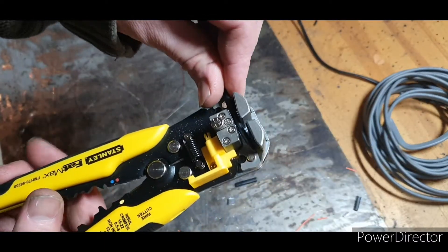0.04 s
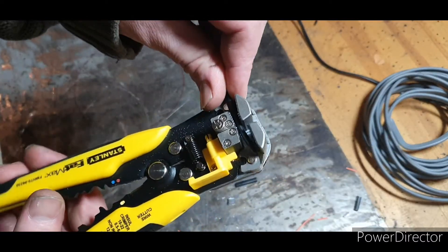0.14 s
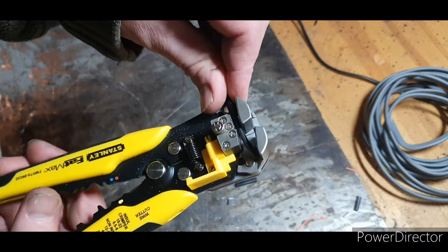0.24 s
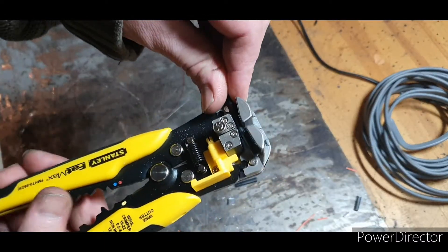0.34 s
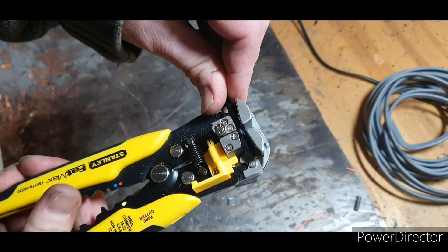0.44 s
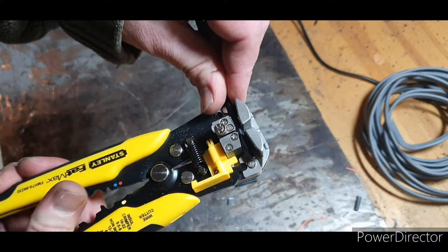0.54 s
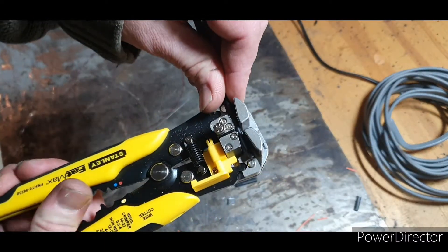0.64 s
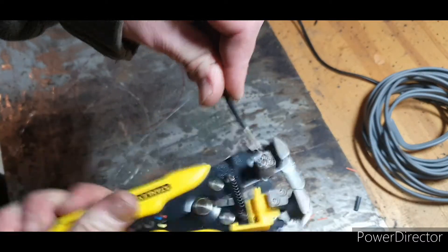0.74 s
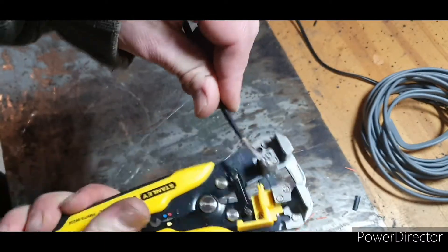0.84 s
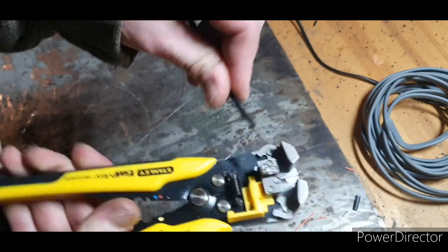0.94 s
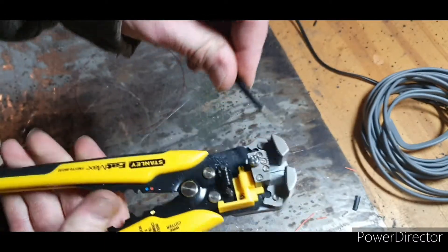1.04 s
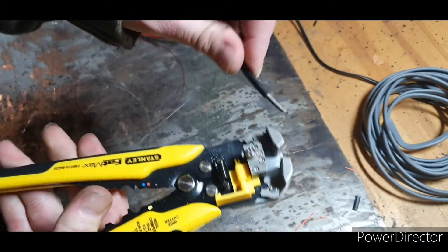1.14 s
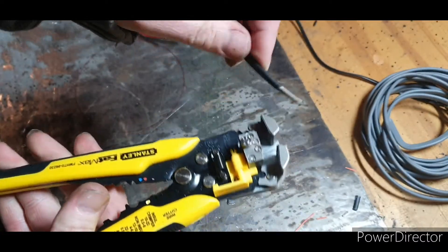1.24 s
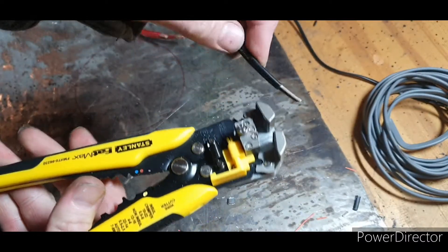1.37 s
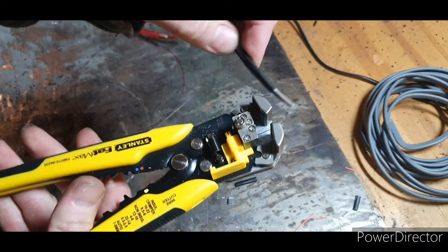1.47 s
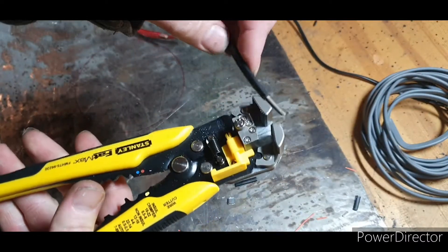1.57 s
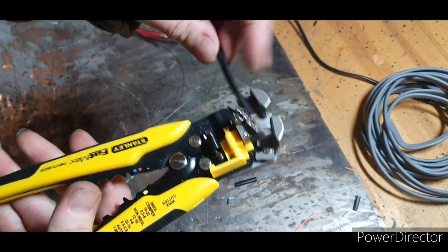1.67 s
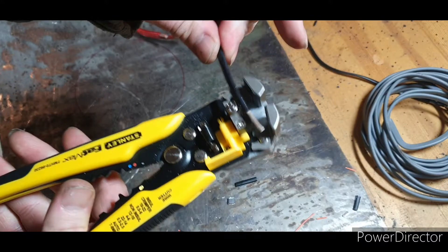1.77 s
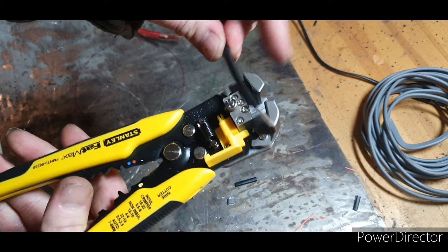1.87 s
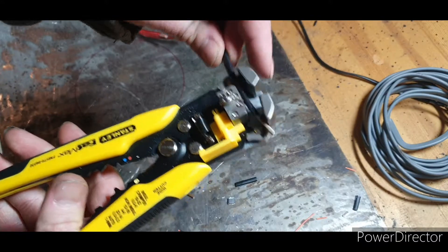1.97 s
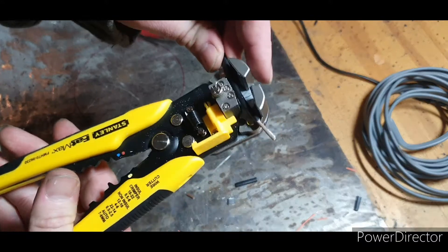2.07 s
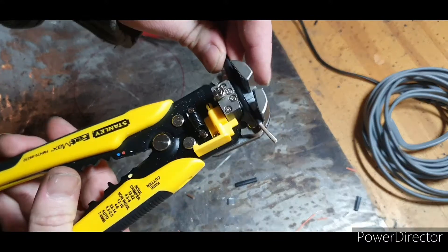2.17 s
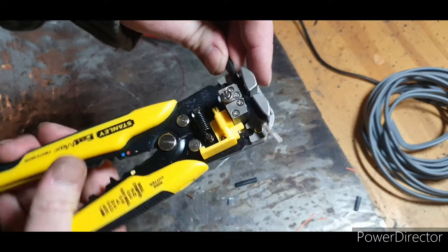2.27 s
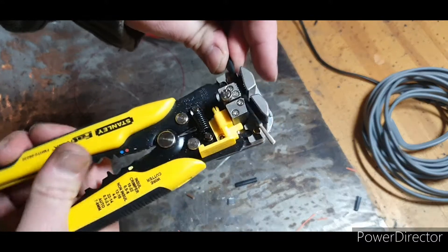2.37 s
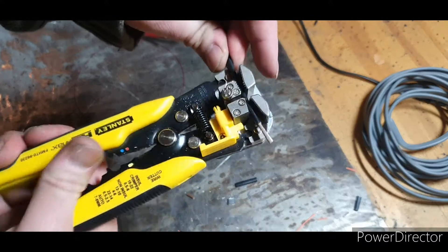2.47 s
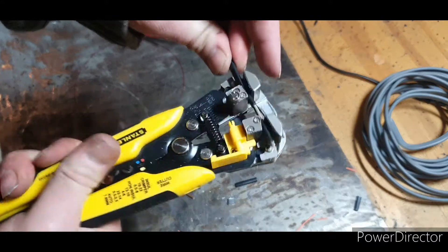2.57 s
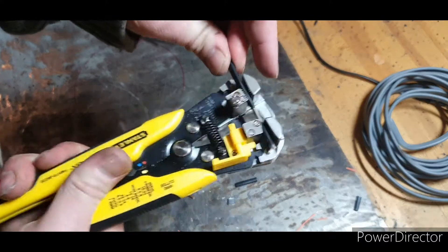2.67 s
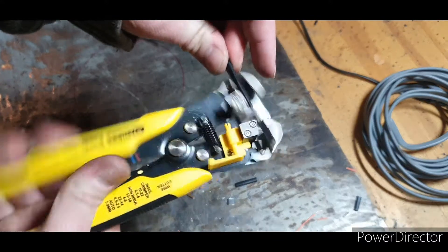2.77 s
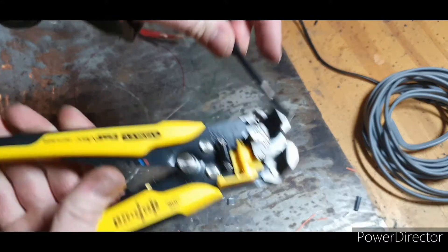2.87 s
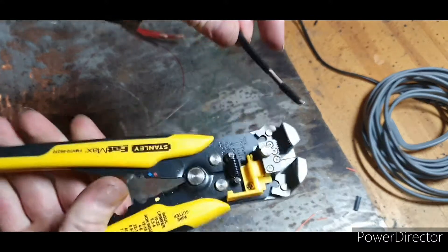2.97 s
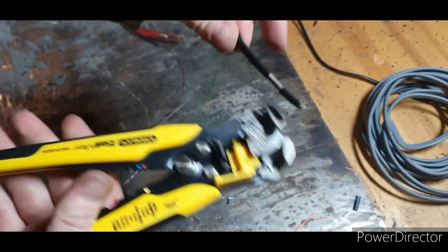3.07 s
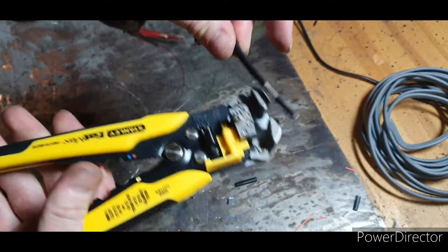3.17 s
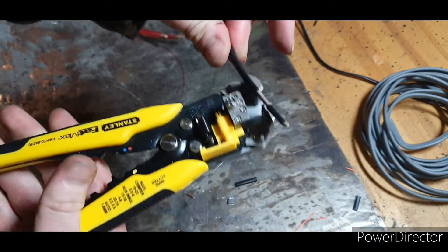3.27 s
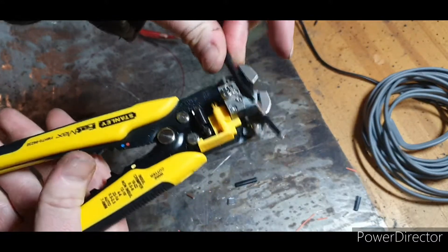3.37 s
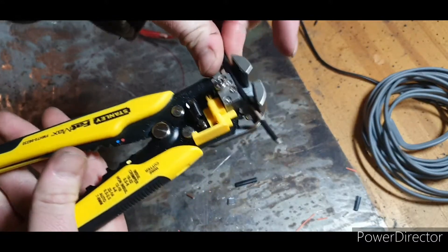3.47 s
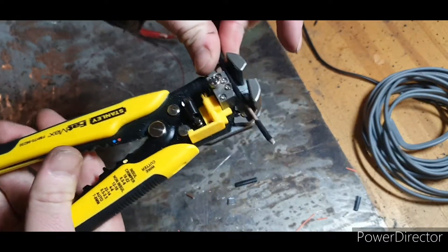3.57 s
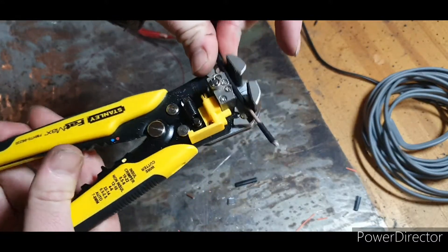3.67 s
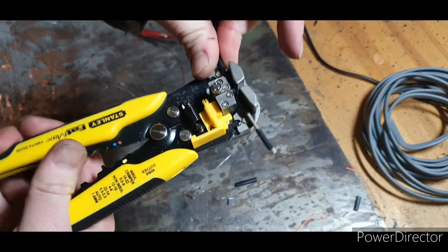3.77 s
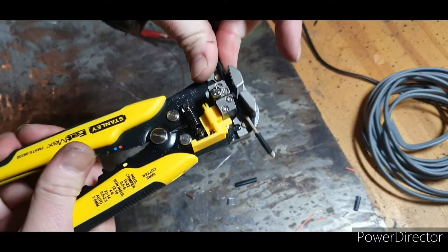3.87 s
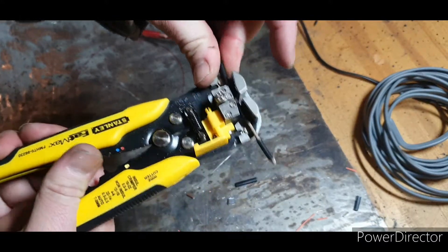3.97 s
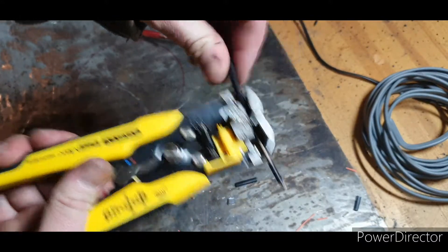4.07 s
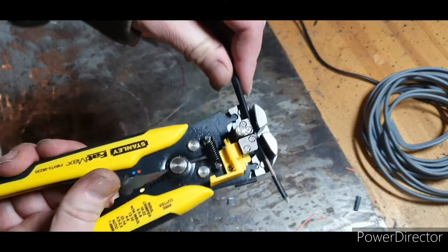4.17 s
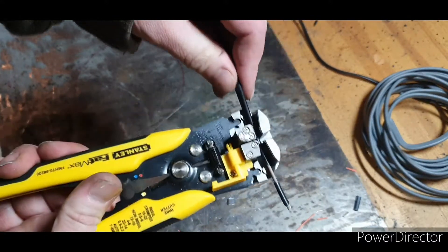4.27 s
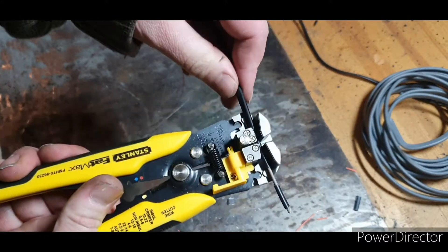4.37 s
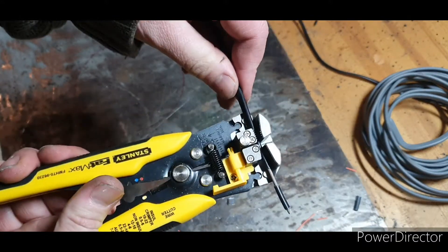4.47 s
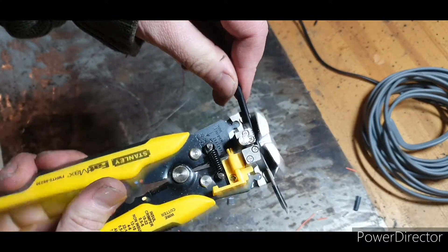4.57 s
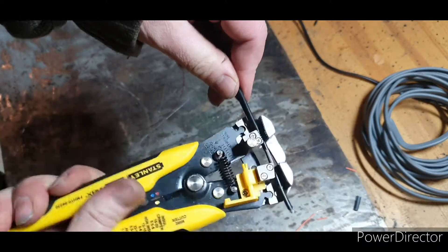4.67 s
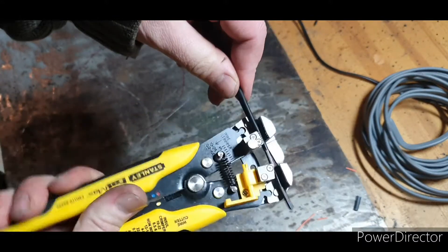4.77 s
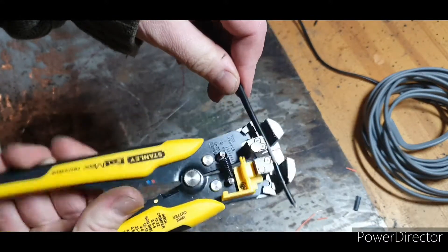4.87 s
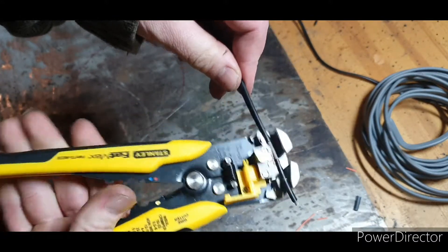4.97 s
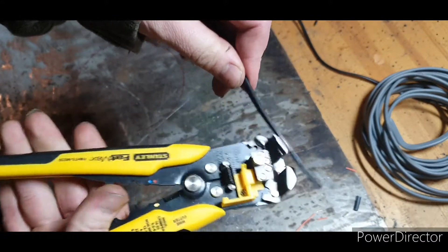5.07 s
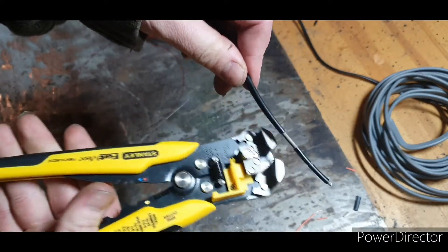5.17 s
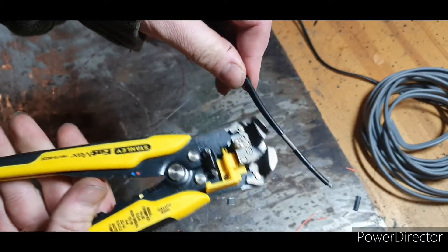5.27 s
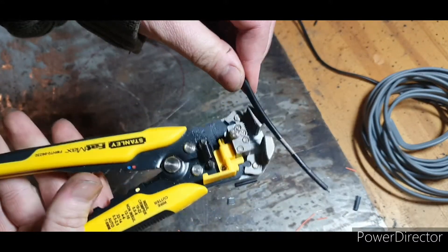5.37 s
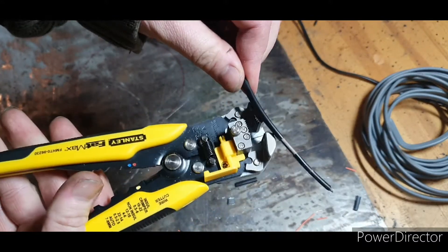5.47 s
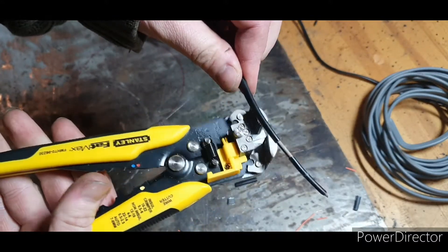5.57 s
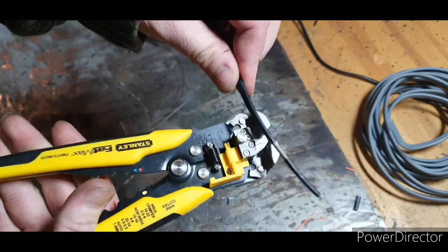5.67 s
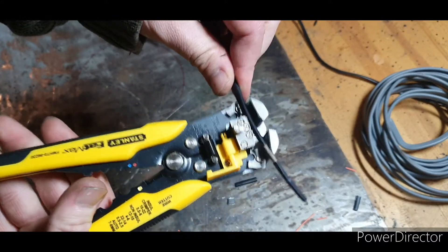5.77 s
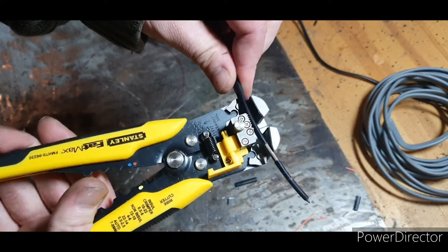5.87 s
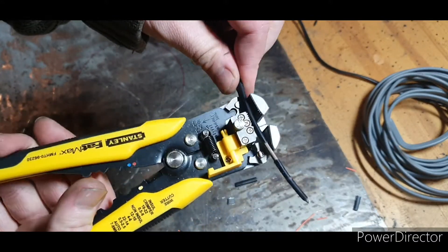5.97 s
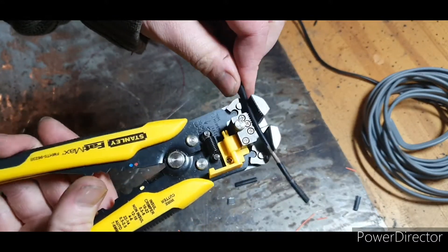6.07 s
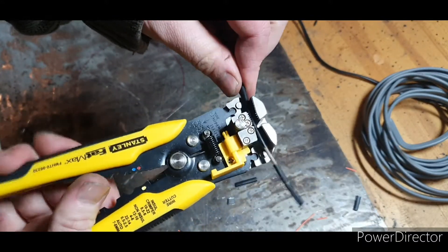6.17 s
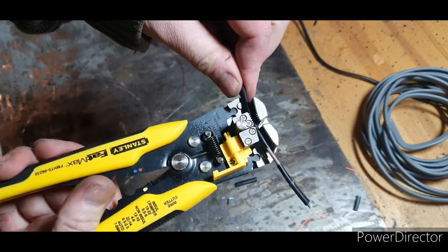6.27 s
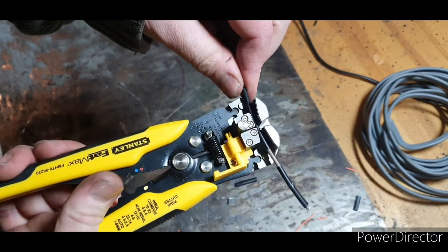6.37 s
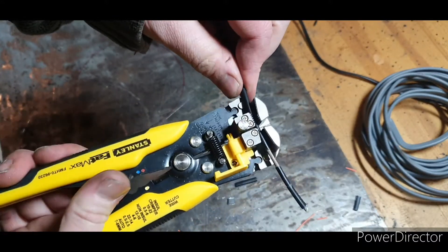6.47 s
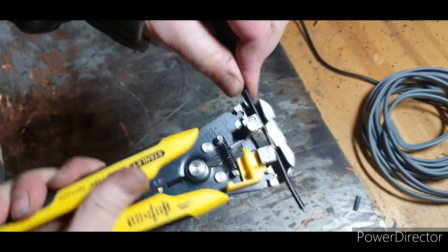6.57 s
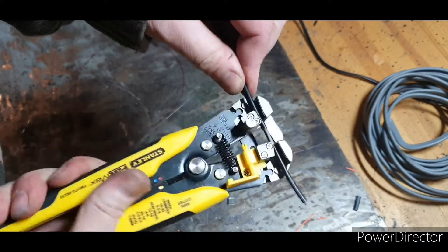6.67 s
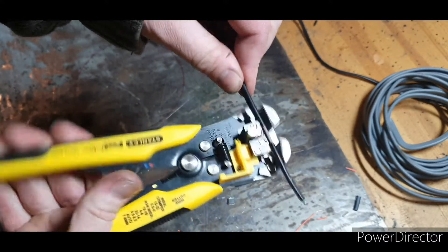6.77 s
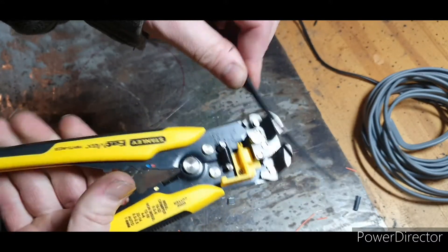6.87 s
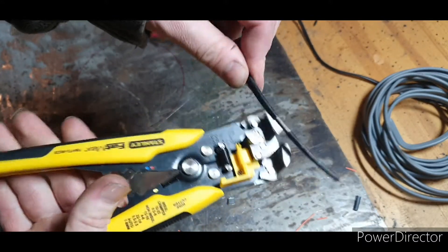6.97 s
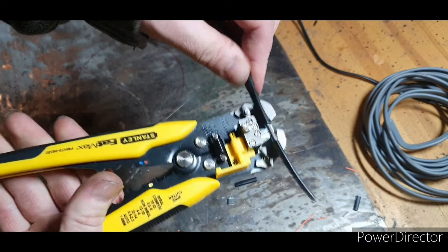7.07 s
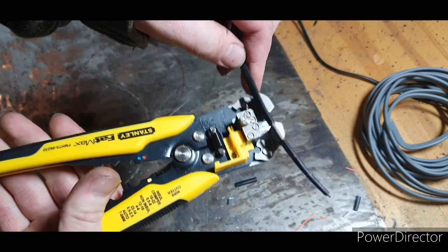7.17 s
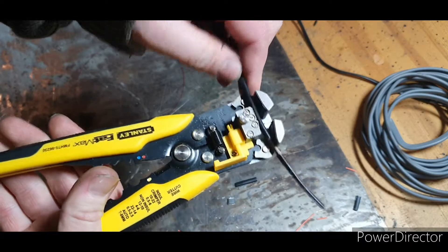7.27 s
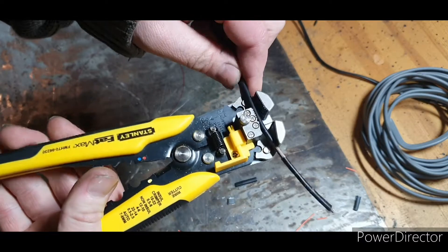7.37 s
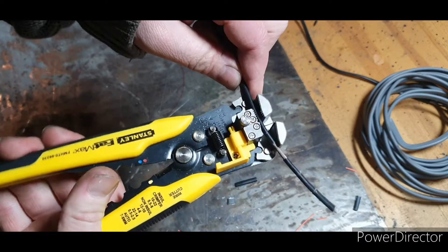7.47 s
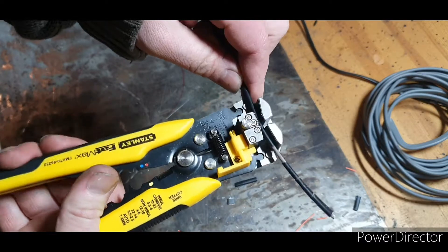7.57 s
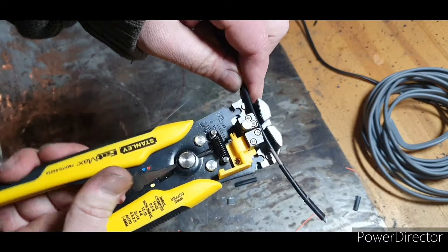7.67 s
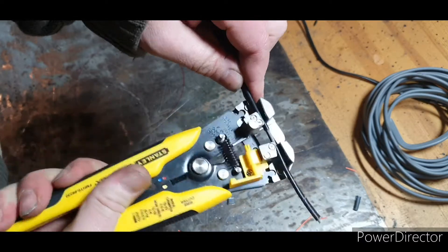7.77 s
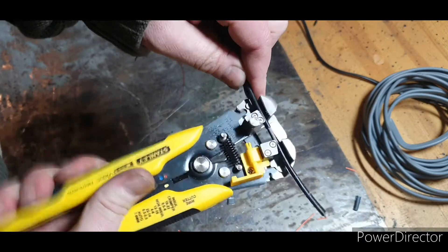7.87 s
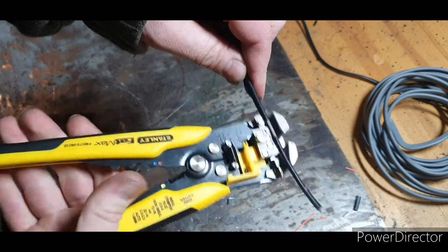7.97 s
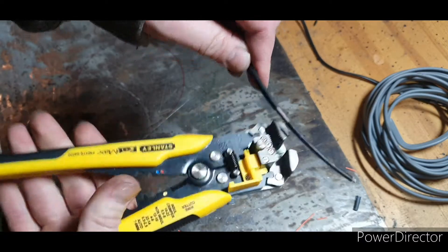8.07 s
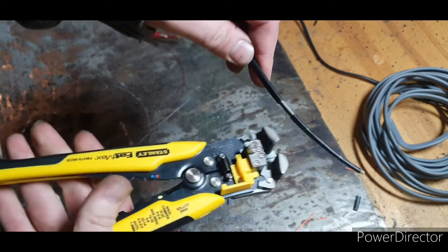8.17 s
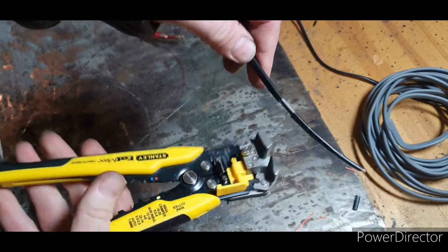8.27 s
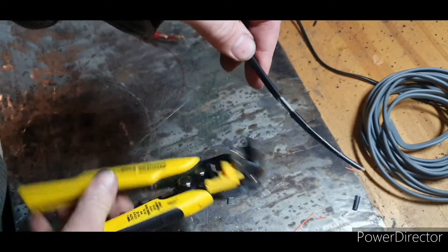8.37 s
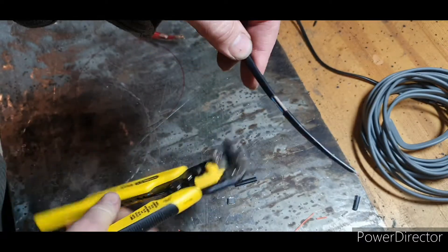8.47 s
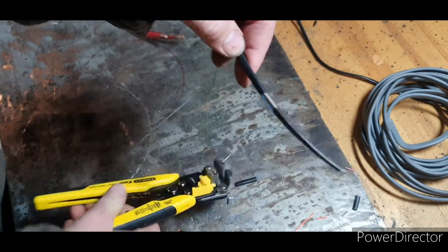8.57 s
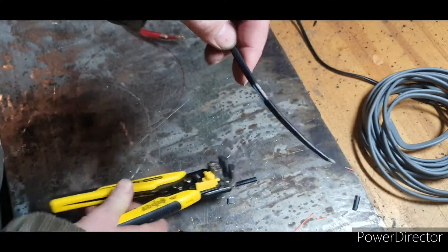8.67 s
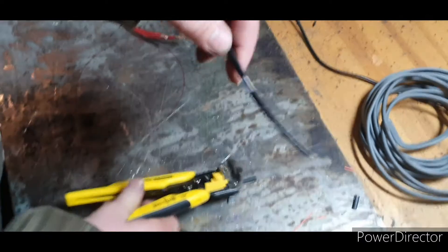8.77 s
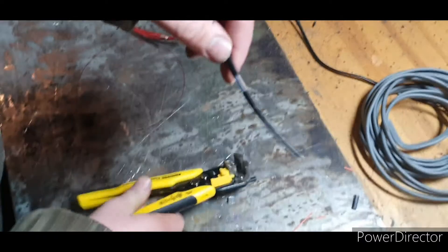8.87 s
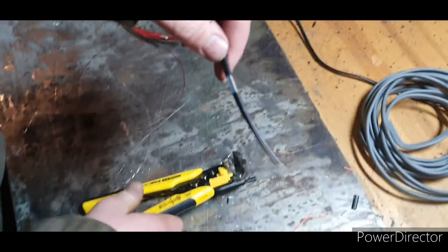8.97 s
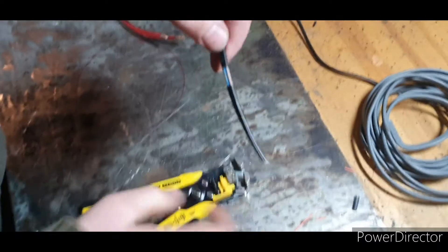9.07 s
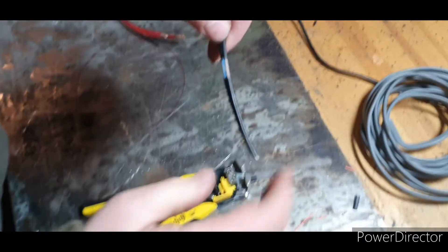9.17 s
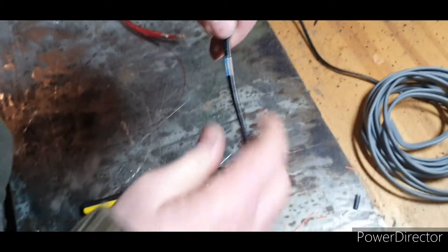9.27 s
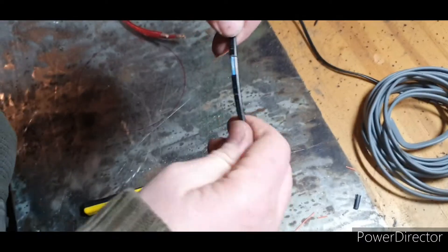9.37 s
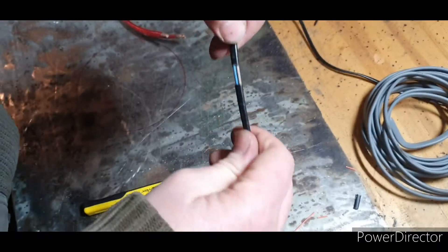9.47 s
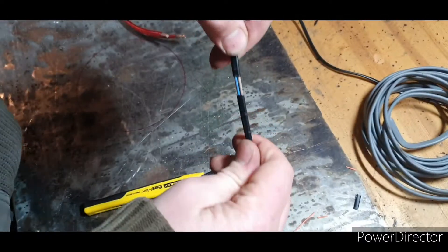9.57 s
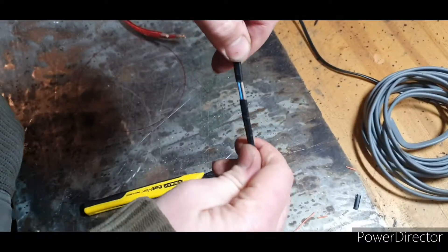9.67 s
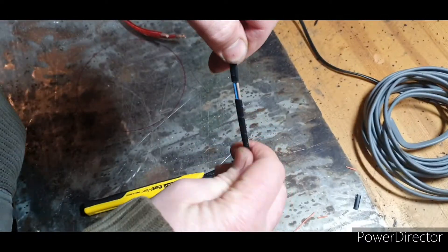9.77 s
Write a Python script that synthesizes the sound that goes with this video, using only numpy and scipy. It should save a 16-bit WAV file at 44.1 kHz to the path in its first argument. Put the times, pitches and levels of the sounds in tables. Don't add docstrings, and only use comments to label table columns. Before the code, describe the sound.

Over a faint distant rumble and thin hiss, wire strippers bite and tear insulation, pause briefly, then release and clack open, five times at uneven intervals. Wire feeding makes tiny scratchy ticks, skin rubs softly on plastic, cloth barely rustles. Short wall reflections follow the sharp hits. At the end, steel lands on a hollow board with a boom, a small rock, and a harder double knock. Phone microphones very close.

```python
import sys
import numpy as np
from scipy import signal
from scipy.fft import rfft, irfft
from scipy.io import wavfile
from scipy.ndimage import uniform_filter1d, map_coordinates

SR = 44100
rng = np.random.default_rng(int(sys.argv[2]) if len(sys.argv) > 2 else 0)


def output_pcm(signal):
    pcm = np.clip(np.atleast_2d(signal).T, -1, 1) * 32767
    wavfile.write(sys.argv[1], SR, np.round(pcm).astype(np.int16))


def elevation(decibels):
    levels = np.asarray(decibels, float)
    return 10 ** (levels / 20)


N = 433503
SPAN = 16384
HZ = np.fft.rfftfreq(SPAN, 1 / SR)
LAG = 9
SIDE = np.array([[.5], [-.5]])

# start_s, peak_db, first_kick_pitch_hz
SQUEEZES = [
    (0.741, -22, 106.3),
    (2.543, -21.5, 120),
    (4.6399, -20.5, 218.8),
    (6.593, -20.5, 200),
    (7.779, -22.5, 149),
]
# start_s, peak_db, strongest_ring_hz, added_scrape_ms
LANDINGS = [
    (8.7897, -12.5, 4200, 4.6),
    (8.9705, -27, 2130, 7.8),
    (9.0377, -36, 5530, 0.51),
    (9.1109, -14, 2800, .85),
    (9.1223, -8, 2020, 2.6),
    (9.1657, -19.5, 2060, 1.6),
]
# frequency_hz, left_over_right_db
BENCH_PAN = [(50, 1.5), (90, -7), (130, 0.5), (200, -2.5), (320, 3.5), (500, -1), (1200, -3)]


def unit(x):
    return x / np.sqrt(np.mean(x ** 2) + 1e-20)


def along(points, hz):
    f, v = np.transpose(points)
    return np.interp(np.log(hz + 1), np.log(f + 1), v)


def wobble(rate):
    knots = rng.standard_normal(int(N * rate / SR) + 4)
    return map_coordinates(knots, [np.arange(N) * rate / SR])


def resonances(modes, hz, scatter_db, apart_db):
    c, w, db = np.transpose(modes)[:, :, None]
    chance = rng.standard_normal((3, len(modes), 1))
    sign = (-1) ** np.arange(len(modes))[:, None]
    strength = elevation(db + scatter_db * chance[0] + apart_db * chance[1:]) * sign
    return np.sum(strength * 1j * hz * w / (c * c - hz * hz + 1j * hz * w), axis=1)


def causal(gain):
    cep = irfft(np.log(gain + 1e-6))
    cep[1:len(cep) // 2] *= 2
    cep[len(cep) // 2 + 1:] = 0
    return np.exp(rfft(cep))


def add(track, s, sound):
    fade = np.clip(np.linspace(5, 0, sound.shape[1]), 0, 1) ** 2
    track[:, max(round(s * SR), 0):][:, :sound.shape[1]] += sound * fade


def heard_from(s):
    # start_s, right_late_samples, left_over_right_db
    place = [(0.7, 10, 2), (1.1, 10.5, -1.1), (2.6, 14, 1), (2.799, 2.6, 0.55), (4.6, 6, -2),
             (4.851, 1.2, -1), (6.6, 5, -1), (6.749, 1.2, -1.5), (7.8, 9, -1.5), (7.93, .7, 0.5),
             (8.801, 2.3, -2)]
    at, lag, pan_db = np.transpose(place)
    late_s = (.5 - SIDE) * np.interp(s, at, lag) / SR
    return elevation(SIDE * np.interp(s, at, pan_db)) * np.exp(-2j * np.pi * HZ * late_s)


def rooms(count):
    # frequency_hz, t60_s
    decay = [(100, 0.71), (500, 0.32), (2500, 0.29), (5000, 0.26), (12000, 0.19)]
    hz, t, z = signal.stft(rng.standard_normal((count, 2, 14000)), SR, nperseg=256)
    tail = signal.istft(z * elevation(-60 * t / along(decay, hz)[:, None]), SR, nperseg=256)[1]
    tail = tail * np.clip(np.arange(tail.shape[-1]) / (0.0014 * SR), 0, 1)
    return rfft(tail / np.linalg.norm(tail[0, 0]), SPAN)


def kind(table, bright_db, knock_db, scrape_ms):
    return [(s, db, bright_db, knock_db, scrape_ms + sum(more), hz) for s, db, hz, *more in table]


def strokes():
    # start_s, peak_db, strongest_ring_hz
    grips = [
        (0.885, -14.5, 4430),
        (2.5112, -53, 7800),
        (2.5383, -23.5, 1718),
        (4.5362, -31, 3480),
        (4.6066, -48, 9700),
        (6.5624, -54, 9200),
        (6.5882, -37, 3070),
        (7.7617, -51, 6900),
        (7.772, -42, 3840),
        (7.9184, -36.5, 8300),
    ]
    # start_s, peak_db, strongest_ring_hz, added_scrape_ms
    bites = [
        (0.742, -13.5, 4480, -1.6),
        (2.5443, -25, 2082, -0.058),
        (4.6427, -15, 3350, -1.6),
        (6.5983, -14.5, 3360, 0.1),
        (7.7808, -20, 3318, 0.1),
    ]
    # start_s, peak_db, strongest_ring_hz
    pulls = [
        (0.7472, -5, 4540),
        (2.5518, -10.5, 3130),
        (4.6484, -10.5, 8990),
        (6.6023, -13, 3290),
        (7.7892, -20, 3700),
    ]
    # start_s, peak_db, strongest_ring_hz
    creeps = [(0.8392, -29, 3340), (0.8588, -37, 3220), (0.872, -31, 5950), (1.1941, -33, 4560),
              (2.6846, -44.5, 6420), (2.8002, -52.5, 3493), (4.7795, -36, 3310), (4.8287, -50, 1900),
              (4.8372, -41, 4470), (5.0828, -40, 4510), (6.7125, -44.5, 3220), (6.7329, -37.5, 3680),
              (6.753, -38, 3670), (7.9024, -51.5, 5300), (7.9339, -30.5, 3300)]
    # start_s, peak_db, strongest_ring_hz
    trips = [
        (0.3667, -33, 5000),
        (0.9351, -15, 3520),
        (2.8151, -17, 4543),
        (4.8619, -18, 9260),
        (6.774, -15.5, 6474),
        (7.9459, -15.5, 3380),
    ]
    # start_s, peak_db, strongest_ring_hz
    rebounds = [
        (0.9485, -11.5, 8884),
        (2.8406, -11.5, 5550),
        (4.8746, -18.5, 4414),
        (6.7915, -14, 4525),
        (7.9562, -10.5, 5512),
    ]
    # start_s, peak_db, strongest_ring_hz, added_scrape_ms
    clacks = [
        (1.0187, -4, 8655, 0.1),
        (2.8647, -4, 4658, -0.8),
        (4.9747, -4, 3865, -0.6),
        (6.8436, -5.5, 4445, -0.5),
        (7.9863, -3, 5364, -1.6),
    ]
    # start_s, peak_db, strongest_ring_hz
    ticks = [(0.3243, -51, 1720), (0.6781, -54.5, 3990), (1.99, -61.5, 5040), (2.0222, -54.5, 4440),
             (2.0368, -58, 3790), (2.3706, -64, 3410), (2.3897, -59, 5200), (2.4213, -56.5, 4510),
             (3.5096, -63.5, 4510), (3.522, -63, 3806), (5.428, -70, 2770), (5.79, -67, 2790),
             (5.8375, -58.5, 3620), (5.8443, -60, 3560), (6.412, -68, 5250), (6.4854, -58.5, 2330),
             (6.4945, -62, 2300), (7.0774, -54, 3453), (7.2999, -60, 3660), (7.3229, -52.5, 4570),
             (7.3325, -56.5, 4550), (7.7162, -62, 5270), (7.725, -63, 4980)]
    # start_s, peak_db, strongest_ring_hz, brightness_db
    feeds = [(1.3322, -40.5, 4030, -12.5), (1.411, -40, 2600, -4), (1.442, -43.5, 2050, -28),
             (1.4645, -39, 3900, -9), (2.2691, -42, 3930, -12), (2.2778, -46, 1880, -7.5),
             (2.306, -42.5, 3620, -14), (2.317, -48, 3740, -13), (3.719, -57.5, 3600, -9),
             (3.732, -45, 3750, -10), (3.7481, -40.5, 3920, -14), (3.7555, -47, 2060, 2),
             (3.7776, -40.5, 3555, -8.5), (6.1668, -45, 3600, -14.5), (6.179, -54, 3610, -10),
             (6.1876, -42, 3636, -4), (6.1948, -38, 4800, -2), (6.212, -36, 3200, -1.5),
             (7.4932, -48.5, 3690, -11), (7.505, -46, 3620, -13), (7.536, -50, 3580, -10),
             (7.5432, -43.5, 1950, -4.5), (7.583, -44, 3320, -11.5)]
    rows = kind(grips, bright_db=3.6, knock_db=-6.5, scrape_ms=1.1)
    rows += kind(bites, bright_db=-1.2, knock_db=-10, scrape_ms=3.6)
    rows += kind(pulls, bright_db=-0.98, knock_db=-14, scrape_ms=0.94)
    rows += kind(creeps, bright_db=-2, knock_db=-17, scrape_ms=2.7)
    rows += kind(trips, bright_db=7.1, knock_db=-25, scrape_ms=2.1)
    rows += kind(rebounds, bright_db=5.4, knock_db=-14.5, scrape_ms=0.61)
    rows += kind(clacks, bright_db=9.3, knock_db=-23.5, scrape_ms=5.1)
    rows += kind(ticks, bright_db=-5, knock_db=-6.5, scrape_ms=0.91)
    knock_db, scrape_ms = -15, 1.2
    return rows + [(s, db, bright_db, knock_db, scrape_ms, hz) for s, db, hz, bright_db in feeds]


def contacts(table, colour, walls, wet_db, rattle):
    # frequency_hz, width_hz, level_db
    jaws = [(1780, 73, -8.5), (2060, 20, -6), (2800, 22, -8.5), (3220, 45, -5.5), (3690, 96, -5.5),
            (4510, 86, -5.5), (5200, 52, -10.5), (6740, 39, -6.5), (8300, 110, -3.5), (9000, 170, -3.5),
            (9200, 41, 0.5), (10560, 87, -2)]
    # frequency_hz, width_hz, level_db
    handle = [(355, 130, -0.5), (705, 52, -1.5), (900, 360, -1.5), (1130, 99, -1), (1789.6, 160, -14)]
    out, t = np.zeros((2, N + SPAN)), np.arange(3072) / SR
    for k, (s, db, bright_db, knock_db, scrape_ms, ring_hz) in enumerate(table):
        lead = np.clip(scrape_ms, .2, 9) / 1000
        after = np.maximum(t - lead, 0)
        soft = np.clip((-db - 24.5) / 25, 0, 1)
        drag = (0.32 + 0.12 * soft) * elevation(-60 * after / (rattle * (1 + 0.68 * soft)))
        stop = 0.3 * (1 - 0.6 * soft) * elevation(-60 * after / 0.002)
        shape = np.where(t < lead, elevation(-12.5 + 3 * t / lead), stop + drag)
        grain = elevation(2.5 * np.repeat(np.clip(rng.standard_normal(192), -2, 1.3), 16))
        both, own = rng.standard_normal(len(t)), rng.standard_normal((2, len(t)))

        grips = elevation(knock_db + 16.0) * resonances(handle, HZ, scatter_db=2.0, apart_db=3.5)
        thud = rfft(shape * (both + 0.91 * own), SPAN) * grips

        blow = int(lead * SR) + 1
        grain[blow - 1:blow + 24] = 1.53
        both[blow] = 3.5 - 3.0 * soft
        own[:, blow] = 1.4 * np.sign(own[:, blow])

        tilt = np.tanh(np.log((HZ + 1) / 6000) * 1.5) * 0.61
        steel = elevation(along(colour, HZ) + bright_db * tilt)
        steel = steel / (1 + soft * (HZ / 11500) ** 12)
        steel = causal(steel / np.sqrt(np.mean(steel[600:5500] ** 2)))
        struck = resonances([(ring_hz, 110 + 0.03 * ring_hz, 7)], HZ, scatter_db=1.0, apart_db=3.0)
        ring = struck + resonances(jaws, HZ, scatter_db=4.5, apart_db=4.5)
        metal = rfft(shape * grain * (0.42 * both + 1.1 * own), SPAN)
        metal = irfft(metal * steel * (.9 + .8 * ring), SPAN)
        metal /= np.sqrt(uniform_filter1d(np.mean(metal ** 2, axis=0), size=40).max())

        around = steel * (.9 + .3 * ring - .15 * struck) + .4 * grips
        around = np.linalg.norm(shape) * around * np.exp(-2j * np.pi * HZ * lead)
        direct = (rfft(metal) + thud) * heard_from(s)
        echoes = elevation(wet_db) * around * walls[k % len(walls)]
        add(out, s - lead, elevation(db - 5.0) * irfft(direct + echoes, SPAN))
    return out[:, :N]


def chatter(steel, walls):
    # start_s, peak_db, strongest_ring_hz
    bounces = [(0.7372, -36.5, 3999), (0.7495, -13.5, 4300), (0.7528, -9.5, 8457), (1.0125, -28.5, 5017),
               (1.0165, -12.5, 5040), (1.0265, -11.5, 5500), (1.030, -20, 3000), (2.2645, -40.5, 3260),
               (2.2715, -49, 4400), (2.3135, -46, 8900), (2.8665, -9.5, 5950), (2.869, -18.5, 1974),
               (2.874, -20, 2045), (4.6365, -32, 8620), (4.978, -11, 6145), (4.984, -26.5, 2200),
               (6.8475, -9.5, 5786), (6.851, -18.5, 1550), (6.858, -22.5, 2100), (6.863, -37.5, 3190),
               (7.988, -13, 3920), (7.993, -19.5, 4600), (8.786, -28, 5870), (4.991, -24.5, 3930),
               (5.009, -33, 2167), (5.031, -31.5, 2990), (5.052, -36.5, 3130), (2.5545, -15.5, 8910),
               (2.5445, -24, 5813), (2.861, -11.5, 5500), (2.8636, -9, 5000), (1.0215, -14, 6000),
               (1.0245, -15, 3600), (6.8428, -9, 5620), (6.845, -11, 4300), (9.1205, -20, 4510),
               (9.126, -20, 2600), (9.1225, -17, 3020), (9.131, -25, 2200), (4.9735, -10, 5900)]
    rows = kind(bounces, bright_db=0, knock_db=-26, scrape_ms=0.65)
    return contacts(rows, steel, walls, wet_db=-7.0, rattle=0.04)


def spring():
    # start_s, pitch_hz, level_db, t60_s
    tones = [
        (1.019, 4000, -42, .17),
        (2.866, 1970, -31, .22),
        (4.976, 3135, -41, .2),
        (6.866, 1780, -36, .17),
        (7.995, 3313, -40, .32),
        (6.85, 2090, -32, .09),
    ]
    blur = 1.1
    out, t = np.zeros((2, N + SPAN)), np.arange(SR // 4) / SR
    late = np.array([[0], [LAG / SR]])
    for s, hz, db, t60 in tones:
        drift = blur * np.cumsum(rng.standard_normal((2, len(t))), axis=1) / np.sqrt(SR / 200)
        add(out, s, elevation(db - 60 * t / t60) * np.sin(2 * np.pi * hz * (t - late) + drift))
    return out[:, :N]


def jolts():
    swing_after_s, swing_db, swing_hz, swing_t60 = .009, -0.2, 66.6, 0.11
    out, t = np.zeros((2, N + SPAN)), np.arange(SR // 4) / SR
    kicks = [(s, db, hz, 0.012) for s, db, hz in SQUEEZES]
    swings = [(s + swing_after_s, db + swing_db, swing_hz, swing_t60) for s, db, hz in SQUEEZES]
    for s, db, hz, t60 in kicks + swings:
        phase = 2 * np.pi * hz * (0.95 * t + 0.0018 * (1 - np.exp(-t / 0.003)))
        push = elevation(db - 60 * t / t60) * np.sin(phase + [[.1], [-.1]])
        add(out, s, push * elevation([[1.8], [-1.8]]))
    return out[:, :N]


def fingers(walls):
    # start_s, peak_db, pitch_hz
    shifts = [(0.434, -54, 308), (0.884, -25, 900), (1.039, -37, 330), (1.208, -44.5, 246),
              (1.334, -53, 408), (1.447, -40, 740), (1.735, -60.5, 242.1), (2.367, -50, 268),
              (2.868, -40, 382), (3.834, -55, 275), (4.697, -34, 900), (4.775, -50.5, 345),
              (4.974, -40, 355), (6.378, -56.5, 332), (6.729, -41, 339), (6.942, -47.5, 290),
              (7.68, -53.5, 396), (7.722, -56, 900), (3.38, -67, 1201), (0.577, -63.5, 696),
              (1.271, -59, 328), (7.955, -38, 299), (7.914, -39, 386)]
    firm, light = (0.056, .45, 1.3), (0.11, .9, 1.1)
    palm_after_s, palm_db, palm_hz, palm_t60 = .012, -9.5, 241, 0.22
    out, t = np.zeros((2, N + SPAN)), np.arange(8192) / SR
    late = np.exp(-2j * np.pi * HZ * np.array([[0], [1]]) * LAG / SR)
    rubs = [(s, db, hz) + (firm if db > -25 else light) for s, db, hz in shifts]
    palms = [(s + palm_after_s, db + palm_db, palm_hz, palm_t60, 1.1, .9) for s, db, hz in SQUEEZES]
    for k, (s, db, hz, t60, width, steep) in enumerate(rubs + palms):
        skin = rng.standard_normal(len(t)) + 0.5 * rng.standard_normal((2, len(t)))
        rub = rfft(elevation(-60 * t / t60) * np.clip(t / 0.0017, 0, 1) * skin, SPAN)
        rub = rub * late * resonances([(hz, width * hz, 0)], HZ, scatter_db=0, apart_db=-1.0) ** steep
        wet = irfft(rub * (1 + elevation(-12) * walls[k % len(walls)]), SPAN)
        add(out, s, elevation(db + 2.5) * wet / abs(irfft(rub, SPAN)).max())
    return out[:, :N]


def knocks(walls):
    # start_s, peak_db, pitch_hz, t60_s
    modes = [(0.8852, -11.5, 900, 0.014), (0.8828, -25, 1450, .012), (0.8852, -19.5, 1500, .012),
             (0.89, -31, 610, .04), (0.8897, -18.5, 1100, 0.019), (0.8955, -25.5, 1130, 0.02),
             (0.9015, -36, 720, .05), (0.9005, -40, 1430, .08), (4.7015, -33, 320, .04),
             (4.777, -39, 390, 0.037), (8.786, -10.5, 98, 0.053), (8.792, -21, 620, .05),
             (9.111, -13, 110, 0.11), (9.123, -17.5, 920, .025), (9.177, -26, 320, 0.087),
             (8.7975, -9.5, 100, 0.22), (8.799, -24, 312, 0.27), (9.143, -17.5, 92, .6),
             (9.25, -25, 95, 0.54), (9.165, -21.5, 315, 0.16), (8.787, -19.5, 810, 0.054),
             (9.032, -17, 110, 0.22), (9.0655, -21.5, 92, 0.27), (8.9655, -10.5, 252, 0.067),
             (8.9885, -15, 110, 0.27), (9.119, -16, 280, 0.051), (9.124, -25, 850, 0.019),
             (9.169, -28, 780, 0.042)]
    # frequency_hz, left_leads_radians
    bench_lead = [(50, .6), (90, -.7), (130, -.2), (200, .8), (320, -.2), (500, -1), (1200, -1.2)]
    out, t = np.zeros((2, N + SPAN)), np.arange(8192) / SR
    for k, (s, db, hz, t60) in enumerate(modes):
        if s > LANDINGS[0][0] - .5:
            pan_db, lead = along(BENCH_PAN, hz), along(bench_lead, hz)
        else:
            pan_db, lead = -6, 1.2 * hz / 1000
        level = elevation(db + SIDE * pan_db - 60 * t / t60) * (1 - np.exp(-t / 0.00042))
        ring = level * np.sin(2 * np.pi * hz * t + SIDE * lead) * np.cos(np.pi * t / t[-1] / 2)
        add(out, s, irfft(rfft(ring, SPAN) * (1 + elevation(-16) * walls[k % len(walls)]), SPAN))
    return out[:, :N]


def board_sides():
    return np.array([causal(elevation(side * along(BENCH_PAN, HZ))) for side in (.5, -.5)])


def bench(walls):
    # start_s, strength_db, contact_ms, rebound_after_ms
    blows = [
        (8.786, -9.5, 1.7, 5.83),
        (8.797, -10.5, 2.9, 12),
        (8.9644, -12.5, 1.5, 11),
        (8.986, -24, 3.7, 15),
        (9.032, -21.5, 2, 20),
        (9.055, -23, 3.1, 20),
        (9.109, -14, 3.5, 6.9),
        (9.121, -5.5, 0.87, 10),
        (9.142, -18, 2.7, 12),
        (9.164, -10, 2.5, 12.86),
    ]
    # frequency_hz, width_hz, level_db
    modes = [(50.5, 16, -6.5), (90, 13, 0.5), (120, 9.7, -2), (200, 22, -8), (231, 34, -8), (314.3, 26, -6),
             (399.4, 23, -8), (557, 30, -15.5), (776, 75, -18), (1148, 110, -10.5), (1510, 90, -15.5)]
    # start_s, end_s, strength_db
    wobbles = [
        (8.993, 9.109, -32),
        (9.129, 9.199, -31.5),
    ]
    hard_ms, hard_loss_db, soft_loss_db = 1.7, 7, 1.5
    out, t = np.zeros((2, N + SPAN)), np.arange(512) / SR
    airborne = (1j * HZ / (1j * HZ + 55)) ** 3
    hits = [row[:3] for row in blows]
    for s, db, ms, gap_ms in blows:
        hits.append((s + gap_ms / 1000, db - (hard_loss_db if ms < hard_ms else soft_loss_db), ms))
    for k, (s, db, contact_ms) in enumerate(hits):
        push = np.sin(np.pi * np.clip(t * 1000 / max(contact_ms, .2), 0, 1)) ** 2
        push = rfft(push / push.sum(), SPAN)
        board = resonances(modes, HZ, scatter_db=2.0, apart_db=4.0) * board_sides()
        echoes = elevation(-11.0) * walls[-k % len(walls)]
        add(out, s, elevation(db + 46.0) * irfft(push * board * airborne * (1 + echoes), SPAN))
    for s, end, db in wobbles:
        shake = rfft(rng.standard_normal(round((end - s) * SR)), SPAN) / (1 + 1j * HZ / 200) ** 3
        board = resonances(modes, HZ, scatter_db=4.0, apart_db=2.5) * board_sides()
        add(out, s, elevation(db + 38.5) * irfft(shake * board * airborne, SPAN))
    return out[:, :N]


def landing(walls):
    # frequency_hz, density_db
    board = [(290, -32.5), (500, -1.5), (1070, -9), (1840, -16), (4490, -21), (6560, -28.5), (10300, -27.5),
             (14900, -39), (16500, -59.5)]
    rows = kind(LANDINGS, bright_db=0.01, knock_db=-28, scrape_ms=0)
    return contacts(rows, board, walls, wet_db=-1.5, rattle=0.045) + bench(walls)


def rush(spectrum):
    # frequency_hz, left_right_likeness
    alike = [(60, 1), (130, 0.72), (290, 0.85), (640, 0.12), (1400, 0)]
    hz = np.fft.rfftfreq(N, 1 / SR)
    turn = np.arccos(np.clip(along(alike, hz), -1, 1)) / 2
    noise = rfft(rng.standard_normal((2, N))) * elevation(along(spectrum, hz))
    mid, side = irfft(noise * [np.cos(turn), np.sin(turn)], N)
    return unit(np.array([mid + side, mid - side]))


def sleeve():
    # start_s, length_s, level_db
    brushes = [
        (1.295, 0.29, -67.5),
        (7.48, 0.15, -75),
        (8.501, 0.14, -78.5),
        (8.6, .15, -80),
        (1.186, .12, -70),
        (5.78, .1, -75),
        (2.26, 0.19, -80),
    ]
    # frequency_hz, density_db
    cloth = [(1000, -30.5), (1540, -4), (3140, -4), (6630, -17), (8910, -6), (15000, -35)]
    t = np.arange(N) / SR
    swell = sum(elevation(db) * np.sin(np.pi * np.clip((t - s) / length, 0, 1)) for s, length, db in brushes)
    return swell * elevation(3.2 * wobble(56)) * rush(cloth)


def workshop():
    # start_s, strength_db
    rumble = [(0.0, -63.5), (0.68, -57.5), (0.87, -57.5), (1.72, -66), (2.42, -61.5), (2.67, -58),
              (3.27, -65), (4.19, -58.5), (4.8, -54.5), (5.06, -47.5), (5.45, -63), (6.23, -60),
              (6.78, -53.5), (7.0, -60.5), (7.56, -63.5), (7.8, -52.5), (8.29, -64), (9.83, -63.5)]
    # frequency_hz, density_db
    deep_colour = [(15, -45), (27, -5), (44, 5.5), (64, 13), (85, -10.5), (100, -51)]
    # frequency_hz, density_db
    upper_colour = [(70, -41.5), (95, -1.5), (130, -2.5), (155, -10.5), (290, -18.5), (400, -25.5),
                    (640, -33), (800, -18.5), (900, -26), (1100, -32), (2000, -43.5), (4000, -62.5)]
    # frequency_hz, density_db
    hiss = [(800, -2.5), (2000, -2), (4000, -2.5), (7100, -23), (8200, -2), (9100, 2), (10500, -12.5),
            (15500, -13)]
    # pitch_hz, level_db
    tones = [(699.8, -86), (802.1, -84)]
    boom_gain_db, boom_t60 = 5, 3.4
    t = np.arange(N) / SR
    at, db = np.transpose(rumble)
    strength_db = np.interp(t, at, db, -120, -120)
    boom_db = sum(boom_gain_db * elevation(-60 * abs(t - s) / boom_t60) * (t > s) for s, db, hz in SQUEEZES)
    deep = elevation(strength_db + 3.5 + 1.2 * wobble(4.6)) * rush(deep_colour)
    follow_db = .15 * (strength_db - strength_db.mean())
    upper = elevation(-66 + follow_db + boom_db + 0.25 * wobble(3.1)) * rush(upper_colour)
    whine = 0
    for hz, db in tones:
        level = elevation(db + 3 + 2 * wobble(3))
        drift = .6 * np.array([wobble(4), wobble(4)])
        whine = whine + level * np.sin(2 * np.pi * hz * t + drift)
    return deep + upper + whine + elevation(-83.5) * rush(hiss)


def scene():
    # frequency_hz, density_db
    steel = [(530, -45.5), (900, -15), (1760, -7.5), (2060, -4), (2560, -4.5), (4430, -1), (5130, -4.5),
             (5720, -4), (7300, -4.5), (8760, -2), (15300, -12), (16500, -31.5)]
    walls = rooms(count=9)
    tool = contacts(strokes(), steel, walls, wet_db=-3.0, rattle=0.033) + chatter(steel, walls)
    tool = tool + spring() + jolts() + fingers(walls)
    return tool + knocks(walls) + landing(walls) + sleeve() + workshop()


def top_cut(x):
    return signal.sosfilt(signal.butter(12, 16810, fs=SR, output="sos"), x)


def record(dry):
    # frequency_hz, gain_db
    port = [(6000, 1), (7300, -3.5), (8900, 2), (11000, 0)]
    top_hz, ceiling = 15500, .97
    hz = np.fft.rfftfreq(N, 1 / SR)
    x = irfft(rfft(dry) * elevation(along(port, hz)) / np.sqrt(1 + (hz / top_hz) ** 70), N)
    x = x / (1 + abs(x / ceiling) ** 5) ** (1 / 5)
    return top_cut(x)


dry = scene()
out = record(dry)
output_pcm(out)
```